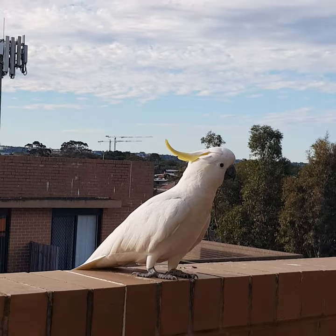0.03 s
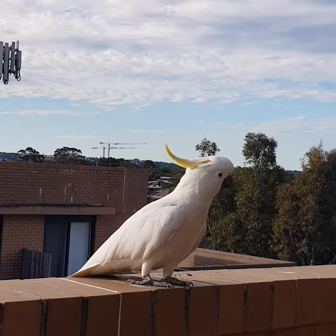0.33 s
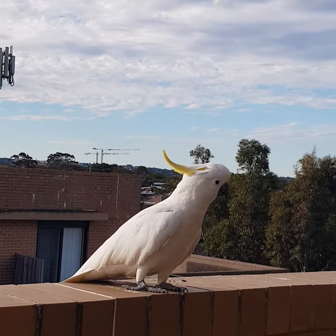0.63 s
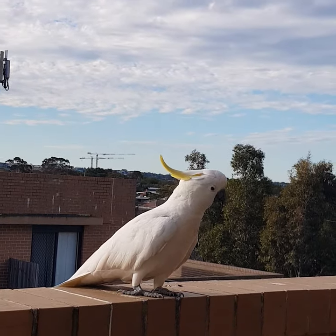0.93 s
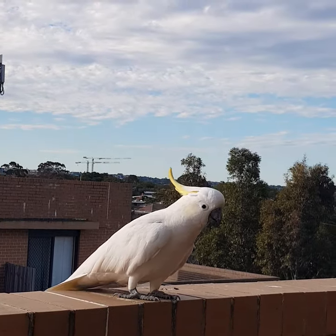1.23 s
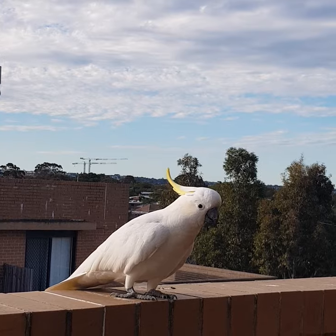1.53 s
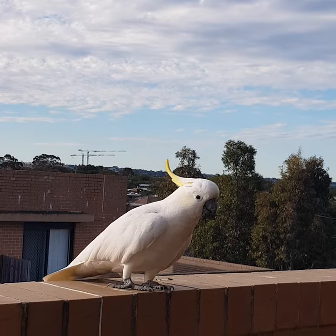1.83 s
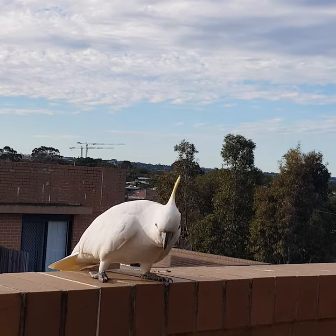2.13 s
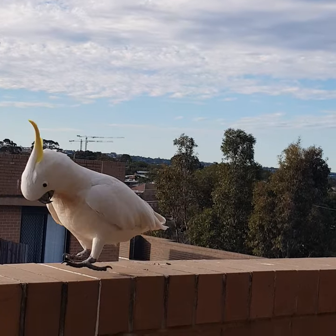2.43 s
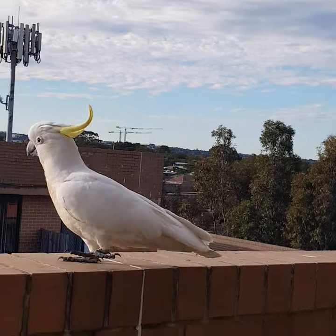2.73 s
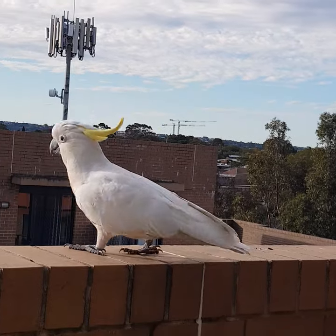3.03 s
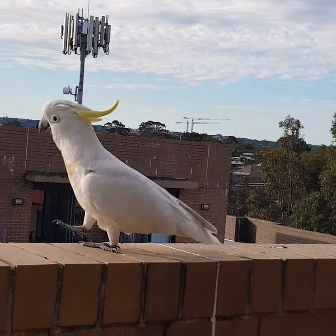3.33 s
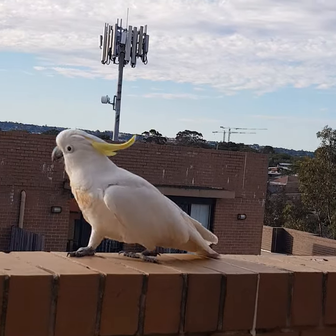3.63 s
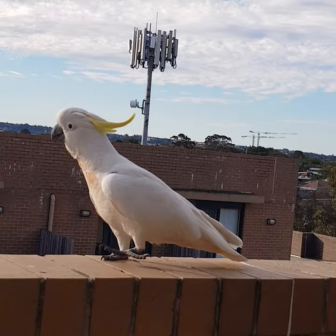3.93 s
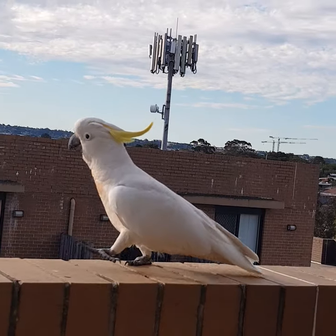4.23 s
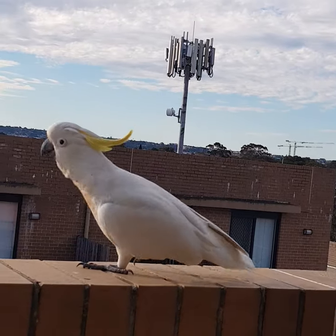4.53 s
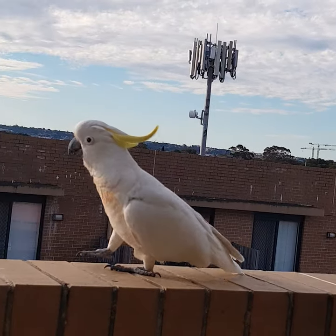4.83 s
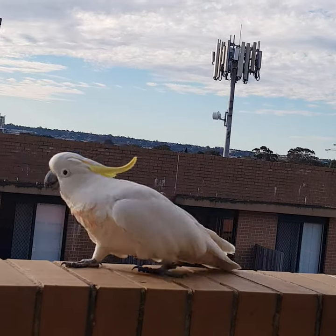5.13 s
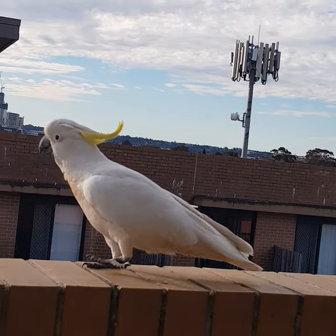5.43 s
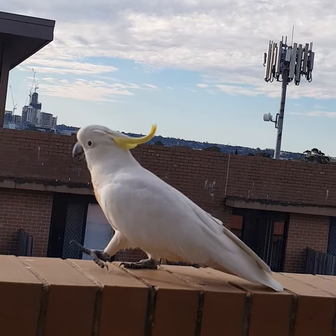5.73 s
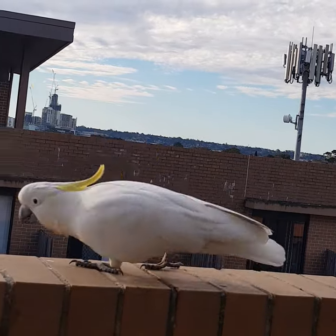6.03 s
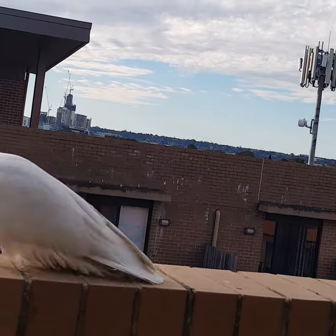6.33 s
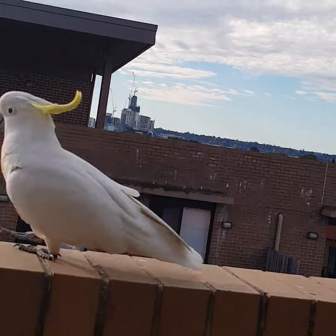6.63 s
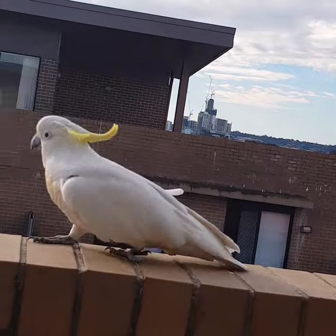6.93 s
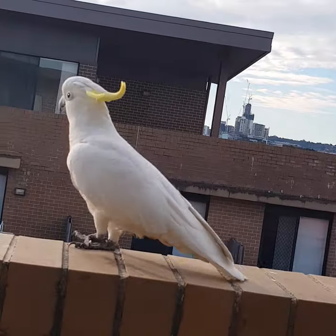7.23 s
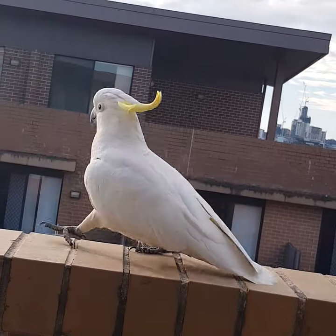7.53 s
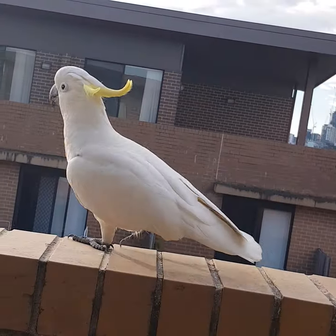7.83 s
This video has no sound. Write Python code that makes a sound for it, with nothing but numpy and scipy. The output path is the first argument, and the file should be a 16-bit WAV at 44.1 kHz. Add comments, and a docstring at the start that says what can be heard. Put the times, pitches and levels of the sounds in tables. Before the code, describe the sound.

Distant town traffic and the low, wavering drone of a heavy engine surround an outdoor balcony. Close by, a large bird steps over brick with sharp, irregular claw clicks, gritty scrapes and light knocks, each with a short echo. Wind rumbles on the left of the microphone during the first two seconds, then drops away. The steps thin out midway and return in small clusters, while feathers rustle softly and crickets chirp faintly.

```python
"""A balcony in town. A cockatoo walks along its brick wall: claws click and scrape, feet knock,
feathers brush, and the balcony rings after them. Behind are a wash of traffic, far bands of hiss,
a heavy engine that revs and eases, and two faint crickets.
Early on a gust buffets the microphone, mostly on the left."""
import sys
import numpy as np
from scipy import signal
from scipy.fft import rfft, irfft
from scipy.io import wavfile
from scipy.ndimage import uniform_filter1d, map_coordinates

SR = 44100
rng = np.random.default_rng(int(sys.argv[2]) if len(sys.argv) > 2 else 0)


def dump_mix(stems):
    """Bounce the given channels to the path in sys.argv[1] as a 16-bit WAV at rate SR."""
    frames = np.atleast_2d(stems).T  # one column per channel
    limited = np.clip(frames, -1, 1)  # hard clip at full scale
    pcm = np.round(limited * 32767).astype(np.int16)
    wavfile.write(sys.argv[1], SR, pcm)


N = 355887
TIME_S = np.arange(N) / SR

# Table levels are relative; each source adds its own gain.
# traffic wash: t/s, level/dB, upper band/dB
TRAFFIC_LEVELS = [(0, -49, -8), (.5, -50.5, -8.5), (1.25, -51, -10), (1.7, -55, -12.5), (2.2, -53, -17),
                  (3.2, -54, -12), (4.2, -51.5, -15), (6.6, -51, -15), (8.07, -52, -15.5)]
# spectra of the wash and the steady hiss: f/Hz, level/dB
TRAFFIC_SPECTRUM = [(20, -11), (50, 16.5), (90, 15), (150, 7.5), (250, 4.5), (400, 0), (650, -0.5),
                    (950, 1.43), (1400, -5), (2000, -12.5), (2600, -23), (3300, -31), (4200, -45),
                    (8000, -52)]
HISS_SPECTRUM = [(1000, -41), (4000, -6), (6000, -2.5), (7500, 0), (9700, -0.5), (12000, 5), (15500, 3),
                 (16500, -7)]
# stereo width of the wash: f/Hz, left-right coherence
TRAFFIC_COHERENCE = [(60, 0.68), (200, 0.94), (600, 0.83), (1400, 0.68), (3100, 0.11)]
# balance of the wash: f/Hz, left minus right/dB
TRAFFIC_BALANCE = [(100, -1.5), (700, 0.9), (1300, -1), (2400, -3.5)]
# heavy engine: t/s, firing rate/Hz, fundamental/dB, octave/dB
ENGINE_REVS = [(0, 58.65, -40, -51), (.42, 57.8, -32, -41.5), (.9, 58, -40.5, -60), (2.15, 60.1, -84, -59),
               (2.43, 61.6, -41, -43), (2.65, 62.8, -48, -56.5), (2.98, 64.1, -48, -45),
               (3.16, 60.54, -43, -43.5), (3.28, 54.6, -38, -55), (3.55, 48, -46.5, -59),
               (4.3, 47.14, -63, -60), (4.85, 50.55, -44.5, -51.5), (5.23, 52.5, -45, -60),
               (5.4, 54.4, -31, -42), (5.65, 56.05, -34.5, -56), (5.8, 57.1, -27.5, -68),
               (6.03, 60.54, -37.5, -45), (6.26, 60.2, -40, -38), (6.45, 60.9, -38, -46),
               (6.68, 61.75, -43.5, -40), (6.9, 61.5, -44, -53), (7.08, 55.84, -33.5, -43),
               (7.35, 54.04, -39, -56), (7.55, 51.8, -53, -59)]
# cricket pace: t/s, running chirp count
HIGH_CHIRPS = [(-.06, 0), (.905, 6), (2.47, 16), (3.24, 21), (6.4, 42), (6.64, 44), (7.21, 48), (8.15, 54)]
LOW_CHIRPS = [(3.125, 0), (3.89, 6), (4.99, 14), (6.65, 26), (7.085, 29), (8.1, 36)]
# cricket loudness: t/s, level/dB
HIGH_LEVELS = [(0, -70.5), (2.2, -74.5), (4.2, -70.5), (8, -70.5)]
LOW_LEVELS = [(3.1, -110), (3.22, -69), (4.6, -64), (6.2, -63.5)]
# far noise bands: t/s, half-length/s, f/Hz, half-width/oct, level/dB
HISS_SWELLS = [(0.2, 0.19, 281, 0.2, -46), (0.05, 0.028, 2700, 0.53, -55), (0.21, 0.12, 2400, 0.59, -53),
               (6.01, 0.085, 4230, 0.12, -73), (5.44, 0.43, 3990, 0.057, -78), (6, .87, 3180, 0.043, -77.5)]
# claws landing on brick: t/s, level/dB, tilt/(dB/oct), scrape/dB, ring/Hz
CLAW_STRIKES = [(.296, -42, 6, -6, 11800), (.4107, -36, -5, -20, 11500), (0.418, -29.5, 0, -11, 6040),
                (0.4259, -24.5, -0.5, -15, 5900), (0.5431, -25.5, 5, -31, 12100),
                (.548, -28.5, 1.5, -30, 6150), (.6255, -36, -4, -13, 5500), (.719, -41.5, -4, -13, 5760),
                (1.3059, -24, -1.5, -13, 5660), (1.444, -31.5, 3, -13, 6300), (1.469, -37, 2, -11, 5100),
                (1.478, -33.5, 4, -21, 5800), (1.7601, -33.5, 1.5, -17, 6160), (1.918, -43, 6.5, -7, 8500),
                (2.66, -31, -4.5, -17, 5700), (2.671, -36.5, -10, -8.5, 6450), (2.687, -34, 7, -12, 9150),
                (2.9444, -50, 0, 3.5, 5600), (3.888, -37.5, -3.5, -8.5, 5840), (4.086, -54, -3, -1.5, 6100),
                (4.373, -40.5, -3, -9, 8390), (4.595, -48, -1.5, -2.5, 8540), (5.175, -36, -3, -20, 11170),
                (5.1798, -31, -0.5, -8, 5570), (5.3178, -40, -2.5, -6.5, 8500),
                (5.3441, -36, -3, -20, 11500), (5.535, -39, -1, -11, 5500), (5.5402, -38.5, -1, -15, 6150),
                (5.844, -41, 6.5, -7, 8600), (5.942, -44.5, 1, -9, 8400), (6.381, -39, 3, -12, 12000),
                (6.664, -30.5, 2, -15, 10700), (6.671, -37, -6, -13, 6250), (6.795, -28, -1.5, -21, 5620),
                (6.8917, -42, 0.5, -2.5, 5740), (7.4637, -39.5, 0, -3, 5450), (7.474, -38, -5, -2.5, 8480),
                (7.4902, -33.5, -12, -18, 5420), (7.5018, -33, -1, -20, 4180), (7.633, -39, 8, -21, 12000),
                (7.6597, -32.5, -4, -18, 5700), (7.671, -35, 3, -32, 6200), (7.778, -41, -2.5, -13, 11050)]
# spectra of a click and a knock: f/Hz, level/dB
CLAW_SPECTRUM = [(300, -37), (1500, -6), (3500, -9), (4700, -4.5), (5900, 1.5), (7300, -4), (8400, 0),
                 (9500, -2), (11800, 1.5), (13500, 0), (15300, 0), (17000, -10.5)]
KNOCK_SPECTRUM = [(300, -43), (1000, 7.5), (1600, 10), (2300, 8.5), (3200, -5), (4300, -4.5), (9000, -37)]
# early balcony reflections: delay/s, left gain, right gain
BALCONY_ECHOES = [(.005, 0.17, 0.19), (.0065, 0.75, 0.11), (0.0104, 0.35, 0.2), (0.0177, 0.089, 0.33)]
# weighted footfalls: t/s, level/dB
FOOT_KNOCKS = [(.418, -41), (1.3047, -45), (2.6595, -46), (2.6863, -40), (5.184, -45.5), (6.669, -59),
               (6.685, -46.5), (7.476, -43.5), (7.49, -42)]
# brushing of feet and feathers: t/s, length/s, level/dB
BRUSH_STROKES = [(0.43, 0.03, -59), (1.138, 0.12, -65.5), (1.446, 0.085, -62), (1.73, .044, -67),
                 (3.871, .03, -74), (4.23, .02, -67), (4.41, 0.15, -68), (6.42, 0.43, -68.5)]
# gust at the microphone: t/s, left level/dB, right minus left/dB
GUST_LEVELS = [(0, -81, -3), (.58, -41, -17), (.85, -29, -11), (1.05, -38, 0.5), (1.18, -25.5, -15),
               (1.45, -28, -5), (1.6, -46.5, 12), (1.85, -45.5, 2), (2.3, -81, -3)]
# turbulence spectrum: f/Hz, level/dB
GUST_SPECTRUM = [(15, -40), (28, 2), (42, 3), (65, 6.5), (110, 2.5), (180, -8.5), (300, -20.5), (500, -37),
                 (1500, -63)]
# single eddies: t/s, level/dB, nominal f/Hz
GUST_BUFFETS = [(0.572, -15, 74), (0.813, -17.5, 95), (0.944, -11.5, 76), (1.277, -6, 70),
                (1.321, -10, 122), (1.358, -12, 77), (1.42, -16.5, 65.7), (1.442, -11.5, 104),
                (1.513, -19.5, 147), (1.651, -22, 84), (1.736, -21, 59.6)]
# close dry ticks: t/s, level/dB, tilt/(dB/oct)
DRY_TICKS = [(.614, -44, 6), (1.75, -43, 3), (2.576, -40.5, 6), (2.742, -47, 7), (3.4381, -43, 13),
             (3.631, -47, 7), (4.407, -49, 1), (5.311, -42, 2), (5.338, -40, 2), (6.155, -50, -12),
             (6.3296, -42, 7), (6.4505, -27, 4), (6.506, -39, -4), (6.56, -42, 2)]

GRIT_PER_S = 900


def amp(db):
    """Decibels to gain."""
    return 10 ** (np.asarray(db) / 20)


def unit_rms(x):
    """Scale to rms 1."""
    return x / np.sqrt(np.mean(x ** 2) + 1e-20)


def at_hz(points, hz):
    """Interpolate on a log-frequency axis."""
    f, value = np.transpose(points)
    return np.interp(np.log(hz + 1), np.log(f + 1), value)


def follow(rows):
    """Interpolate each column of a time table at every sample."""
    times_s, *columns = np.transpose(rows)
    return [np.interp(TIME_S, times_s, column) for column in columns]


def add(mix, start_s, sound):
    """Mix in a sound at start_s."""
    part = mix[..., max(round(start_s * SR), 0):][..., :sound.shape[-1]]
    part += sound[..., :part.shape[-1]]


def noise(spectrum_db, coherence):
    """Stereo noise, rms 1, of given spectrum and left-right coherence."""
    hz = np.fft.rfftfreq(N, 1 / SR)
    left, other = rng.standard_normal((2, len(hz))) + 1j * rng.standard_normal((2, len(hz)))
    right = coherence * left + np.sqrt(1 - coherence ** 2) * other
    return unit_rms(irfft(np.array([left, right]) * amp(spectrum_db(hz)), N))


def drift(rate_hz):
    """Smooth random wander, rms 1."""
    knots = rng.standard_normal(4096)
    return unit_rms(map_coordinates(knots, [TIME_S * rate_hz], order=3, mode="wrap"))


def traffic(gain_db=7.5, waver_db=.5, flutter_db=2.4, hiss_db=-71):
    """Wash of far roads, brighter at times, with a lumpy rumble and a thin steady hiss."""
    hz = np.fft.rfftfreq(N, 1 / SR)
    level_db, upper_db = follow(TRAFFIC_LEVELS)
    sides = np.array([[.5], [-.5]])
    wash = noise(lambda f: at_hz(TRAFFIC_SPECTRUM, f) + sides * at_hz(TRAFFIC_BALANCE, f),
                 at_hz(TRAFFIC_COHERENCE, hz))
    upper = signal.sosfiltfilt(signal.butter(2, 1700, "high", fs=SR, output="sos"), wash)
    rumble = signal.sosfiltfilt(signal.butter(2, 130, fs=SR, output="sos"), wash)
    wash += upper * (amp(upper_db - np.median(upper_db)) - 1)
    wash += rumble * (amp(flutter_db * drift(10) - .5) - 1)
    wash *= amp(level_db + gain_db + waver_db * drift(7.6))
    return wash + amp(hiss_db) * noise(lambda f: at_hz(HISS_SPECTRUM, f), coherence=.036)


def engine(waver=.012, flutter=.32, street_hz=140, street_width_hz=12, street_db=-52):
    """Three firing harmonics carry this far; the third swells as it passes a street resonance."""
    firing_hz, fundamental_db, octave_db = follow(ENGINE_REVS)
    turns = np.cumsum(firing_hz * (1 + waver * drift(14))) / SR
    third = amp(street_db) * np.exp(-((3 * firing_hz - street_hz) / street_width_hz) ** 2)
    gains = [amp(fundamental_db), amp(octave_db), third]
    return sum(gain * (1 + flutter * drift(12)) * np.sin(2 * np.pi * k * turns)
               for k, gain in enumerate(gains, 1))


def cricket(chirps, levels, hz, width_hz, half_beats, fall_hz_per_beat, strokes_per_beat=7):
    """One chirp a beat: about three uneven wing strokes on a resonance that sags in pitch."""
    offset_beats = (follow(chirps)[0] + .5) % 1 - .5
    strokes = np.cos(np.pi * strokes_per_beat * offset_beats) ** 4 * amp(.9 * drift(20))
    carrier = np.exp(2j * np.pi * np.cumsum(hz - fall_hz_per_beat * offset_beats) / SR)
    bands = [carrier * (drift(width_hz) + 1j * drift(width_hz)) for _ in range(2)]
    tone = np.array([unit_rms(band.real) for band in bands])
    envelope = np.exp(-(offset_beats / half_beats) ** 2)
    return tone * unit_rms(strokes) * envelope * amp(follow(levels)[0])


def crickets():
    """Two crickets, each at its own pitch and pace; the lower joins later."""
    high = cricket(HIGH_CHIRPS, HIGH_LEVELS, hz=6020, width_hz=750, half_beats=.17, fall_hz_per_beat=1100)
    low = cricket(LOW_CHIRPS, LOW_LEVELS, hz=5360, width_hz=520, half_beats=.14, fall_hz_per_beat=700)
    return high + low


def hisses():
    """Far bands of hiss that swell and fade unevenly."""
    out = np.zeros((2, N))
    for centre_s, half_s, hz, half_oct, db in HISS_SWELLS:
        band = noise(lambda f: -4 * (np.log2((f + 1) / hz) / half_oct) ** 2, coherence=.14)
        out += band * amp(db + 2 * drift(10)) * np.exp(-((TIME_S - centre_s) / half_s) ** 2)
    return out


def click(spectrum, tilt_db_oct=0., ring_hz=None, ring_db=5.5, ring_width_hz=720, ragged_db=2.2):
    """One contact, each with its own colour; a ringing claw adds a resonance and its octave."""
    hz = np.fft.rfftfreq(1024, 1 / SR)
    shared, *own = unit_rms(uniform_filter1d(rng.standard_normal((3, len(hz))), size=22, axis=1))
    ragged = (shared + np.array(own)) / np.sqrt(2)
    db = at_hz(spectrum, hz) + tilt_db_oct * np.log2(np.maximum(hz, 4500) / 8000) + ragged_db * ragged
    if ring_hz:
        db += sum(ring_db / k * np.exp(-((hz - k * ring_hz) / ring_width_hz) ** 2) for k in (1, 2))
    log_gain = np.log(amp(np.concatenate([db, db[:, -2:0:-1]], axis=1)))
    pulse = np.fft.ifft(np.exp(np.conj(signal.hilbert(log_gain)))).real  # minimum phase
    return pulse / abs(pulse).max(axis=1).mean()


def grit(samples):
    """Sparse stereo impulses from grains of brick."""
    return rng.standard_normal((2, samples)) * (rng.random(samples) < GRIT_PER_S / SR)


def claw_strike(tilt_db_oct, scrape_db, ring_hz, skid_s=.00018, scrape_s=.024):
    """A claw skids, longer if it scrapes, then catches on grit. Returns (lead_s, sound)."""
    t = (np.arange(2560) - 128) / SR
    skid_envelope = np.exp(-abs(t) / (skid_s * (1 + 2 * amp(scrape_db))))
    skid_spectrum = rfft(rng.standard_normal((2, len(t))) * skid_envelope)
    white_skid = irfft(skid_spectrum / abs(skid_spectrum))
    scrape = amp(scrape_db) * grit(len(t)) * (t > 0) * np.exp(-t / scrape_s)
    response = click(CLAW_SPECTRUM, tilt_db_oct, ring_hz)
    return -t[0], signal.fftconvolve(white_skid + scrape, response, axes=1)


def claws(gain_db=4):
    """Claws land on the brick, at first more to the left."""
    out = np.zeros((2, N))
    for start_s, db, tilt_db_oct, scrape_db, ring_hz in CLAW_STRIKES:
        lead_s, sound = claw_strike(tilt_db_oct, scrape_db, ring_hz)
        add(out, start_s - lead_s, amp(db + gain_db) * sound)
    out[1] *= amp(np.linspace(-4, -.5, N))
    return out


def balcony(sound, tail_db=-2.5, t60_s=.47, treble_t60_s=.32, build_s=.0033, tails=3):
    """Walls and ceiling return distinct echoes, then a dense tail that changes as the bird walks."""
    t = np.arange(SR // 2) / SR
    onset = 1 - np.exp(-(t / build_s) ** 4)
    out = np.zeros((2, N))
    for k in range(tails):
        hz, frame_s, bins = signal.stft(rng.standard_normal((2, len(t))), SR, nperseg=256)
        decay_s = at_hz([(2000, t60_s), (14000, treble_t60_s)], hz)[:, None]
        tail = signal.istft(bins * amp(-60 * frame_s / decay_s), SR, nperseg=256)[1][:, :len(t)] * onset
        tail *= amp(tail_db) / np.linalg.norm(tail[0])
        crossfade = np.sqrt(2 / tails) * np.cos(np.pi * (TIME_S / 2 + k / tails))
        out += signal.oaconvolve(sound * crossfade, tail, axes=1)[:, :N]
    for delay_s, left, right in BALCONY_ECHOES:
        add(out, delay_s, sound * [[left], [right]])
    return out


def taps(rows, spectrum):
    """One plain click a row, tilted where the row gives a tilt."""
    out = np.zeros((2, N))
    for start_s, db, *tilt_db_oct in rows:
        add(out, start_s + .0009, amp(db) * click(spectrum, *tilt_db_oct))
    return out


def knocks(crunch=.59, crunch_s=.022):
    """The foot's weight: a dull knock with grit crunching under it."""
    t = np.arange(2048) / SR
    force = (t == 0) + crunch * grit(len(t)) * np.exp(-t / crunch_s)
    return signal.oaconvolve(taps(FOOT_KNOCKS, KNOCK_SPECTRUM), force, axes=1)[:, :N]


def scuffs(grains_per_s=1500, spread_db=4.5, rustle_db=-87, swell_db=4.5):
    """Feet and feathers brush in tiny grains; the feathers rustle faintly throughout."""
    strokes = sum(amp(db) * np.exp(-(2 * (TIME_S - centre_s) / length_s) ** 2)
                  for centre_s, length_s, db in BRUSH_STROKES)
    rustle = amp(rustle_db + swell_db * drift(6))
    grains = rng.standard_normal((2, N)) * amp(spread_db * np.minimum(rng.exponential(1, N), 4))
    grains *= rng.random(N) < grains_per_s / SR
    texture = signal.oaconvolve(grains, click(CLAW_SPECTRUM), axes=1)[:, :N]
    return (strokes + rustle) * unit_rms(texture)


def gust(flutter_db=2.6, damping=1.26, edge_hz=600):
    """Turbulence at each microphone port, with ragged buffets on the left; harder ones are brighter."""
    left_db, right_offset_db = follow(GUST_LEVELS)
    air = noise(lambda f: at_hz(GUST_SPECTRUM, f), coherence=.099)
    air *= amp(np.array([left_db, left_db + right_offset_db]) + flutter_db * drift(29.8))
    t = np.arange(SR // 8) / SR
    port = signal.butter(2, 26, "high", fs=SR, output="sos")
    for start_s, db, hz in GUST_BUFFETS:
        turns = 2 * np.log1p(hz * t / 1.24)  # the eddy slows as it spreads
        lowpass = signal.butter(4, edge_hz * amp(db) ** .4, fs=SR, output="sos")
        eddy = np.cos(2 * np.pi * turns + 1) + 1.01 * rng.standard_normal(len(t))
        push = signal.sosfilt(np.vstack([lowpass, port]), eddy * np.exp(-damping * hz * t))
        add(air, start_s - .001, amp([[db], [db - 20]]) * push)
    return air


def ticks(gain_db=1.5):
    """Dry ticks close to the microphone."""
    return amp(gain_db) * taps(DRY_TICKS, CLAW_SPECTRUM)


def scene():
    """The bird rings the balcony, the crickets arrive mostly as its echo, the town lies behind."""
    bird = claws() + scuffs()
    thuds = knocks()
    chirps = crickets()
    direct = bird + amp(3.5) * thuds + .5 * chirps + ticks()
    reflected = balcony(bird + amp(.5) * thuds + chirps)
    return direct + reflected + traffic() + hisses() + engine() + gust()


def record(dry):
    """The recorder's band limit."""
    edge_hz = 16050
    lowpass = signal.firwin(255, edge_hz, window=("kaiser", 8), fs=SR)
    return signal.oaconvolve(dry, lowpass[None], "same", axes=1)


dry = scene()
out = record(dry)
dump_mix(out)
```